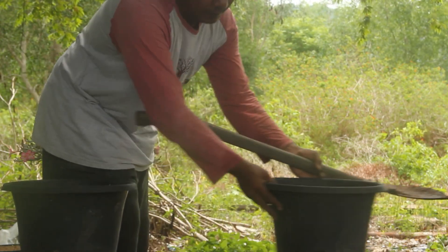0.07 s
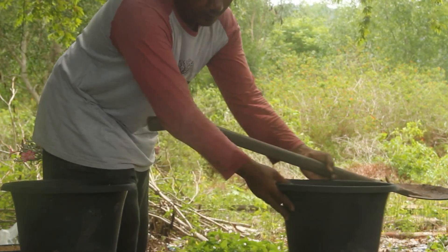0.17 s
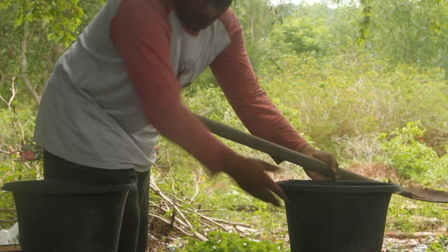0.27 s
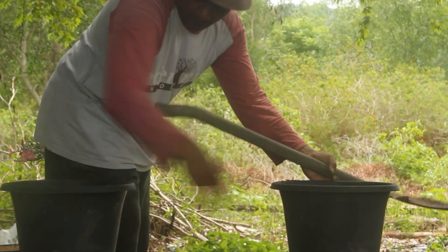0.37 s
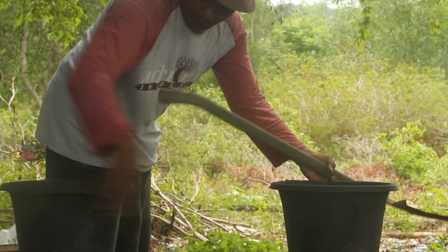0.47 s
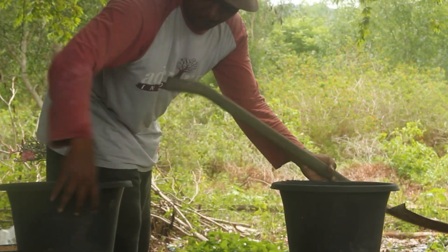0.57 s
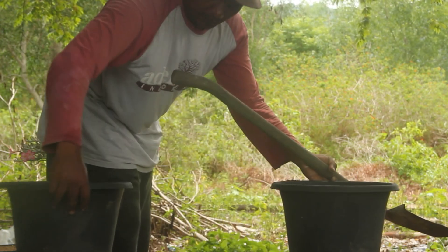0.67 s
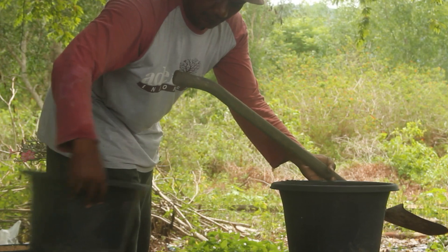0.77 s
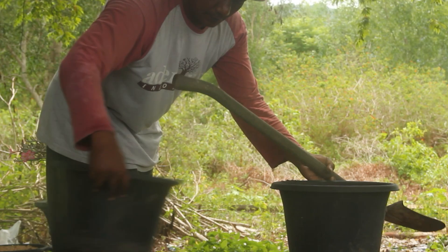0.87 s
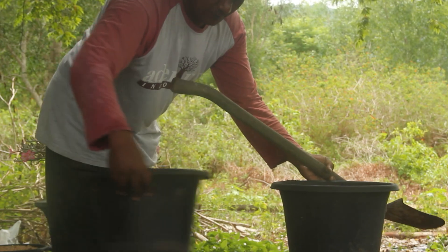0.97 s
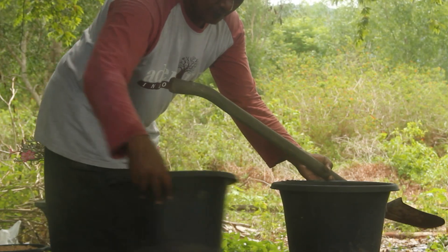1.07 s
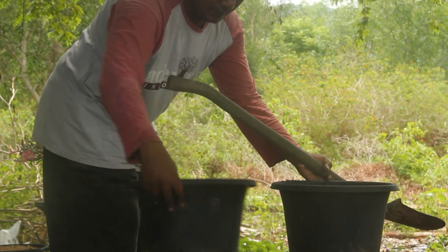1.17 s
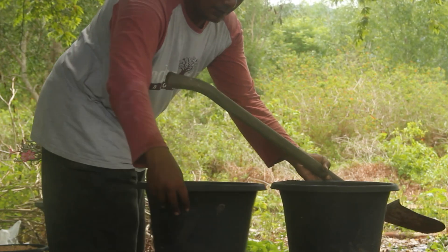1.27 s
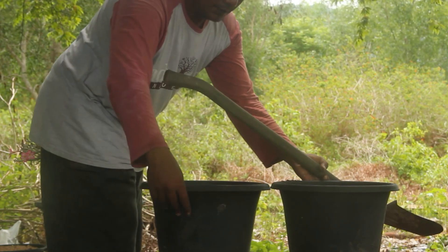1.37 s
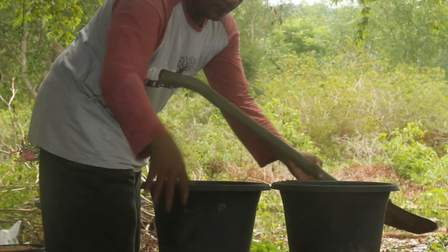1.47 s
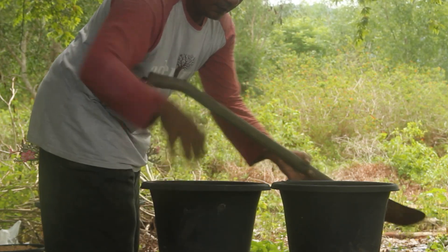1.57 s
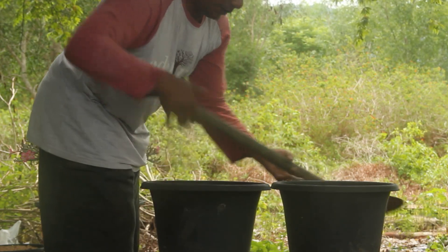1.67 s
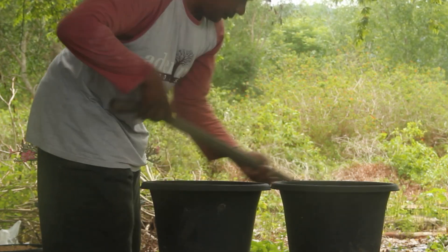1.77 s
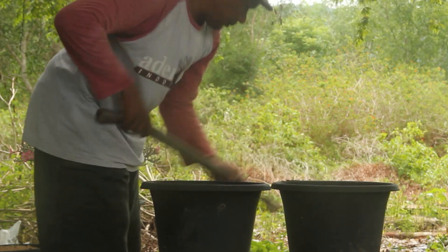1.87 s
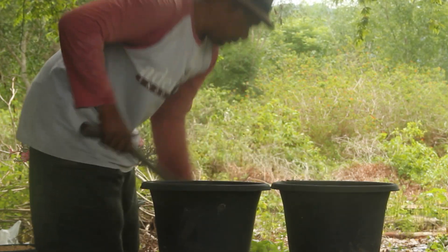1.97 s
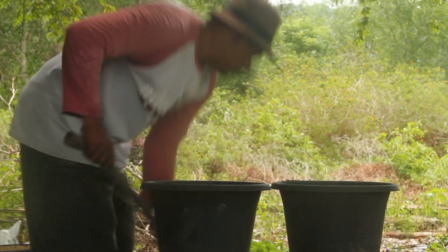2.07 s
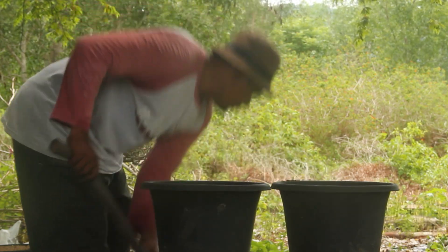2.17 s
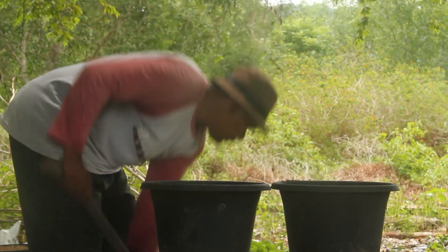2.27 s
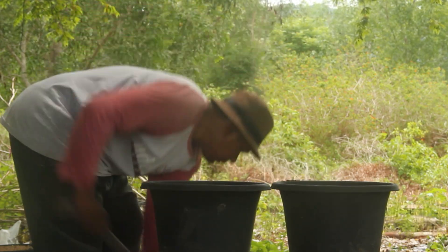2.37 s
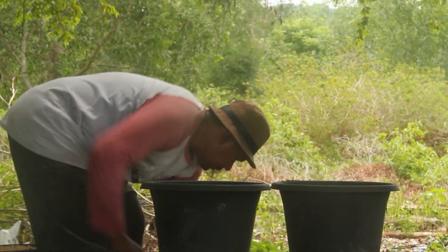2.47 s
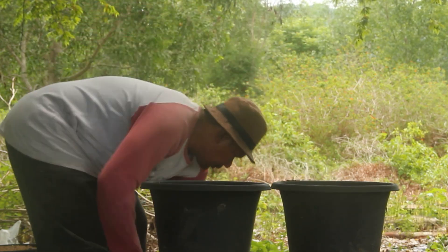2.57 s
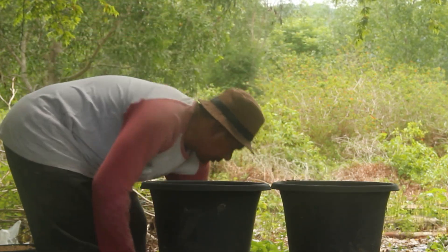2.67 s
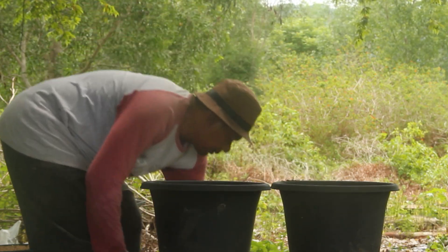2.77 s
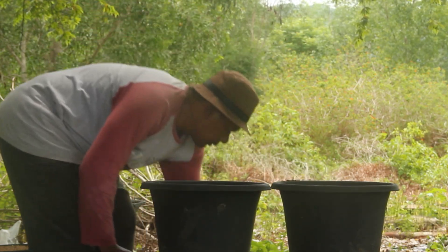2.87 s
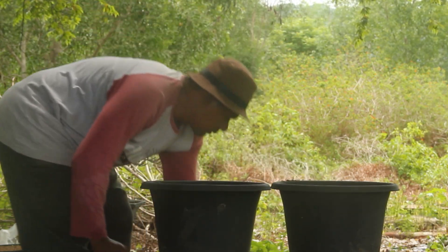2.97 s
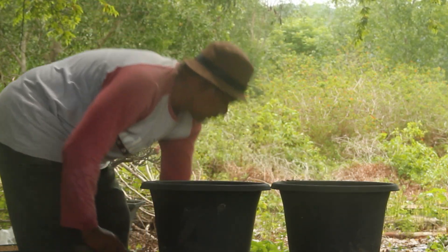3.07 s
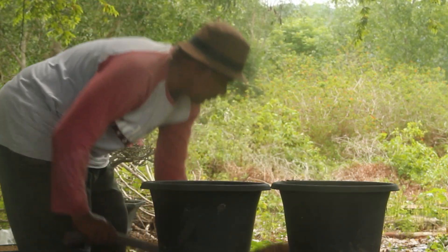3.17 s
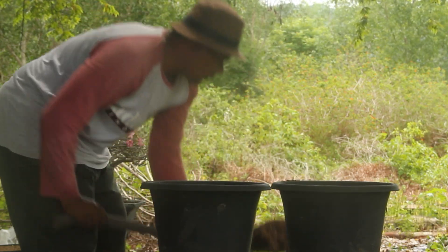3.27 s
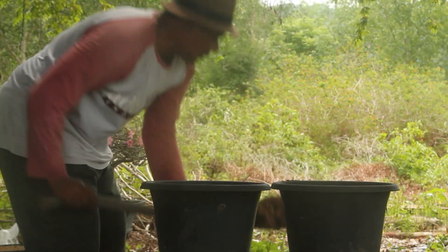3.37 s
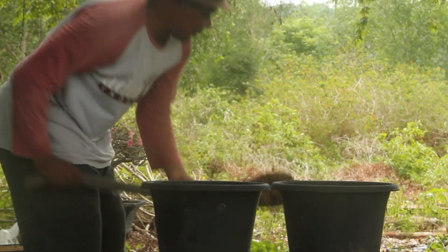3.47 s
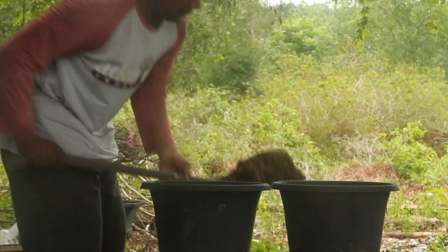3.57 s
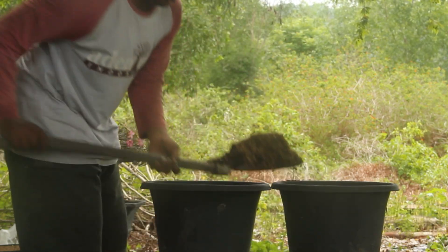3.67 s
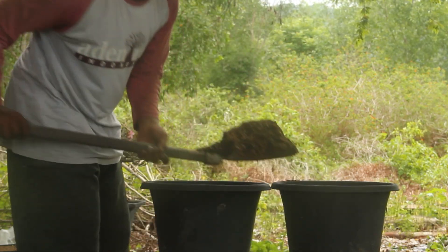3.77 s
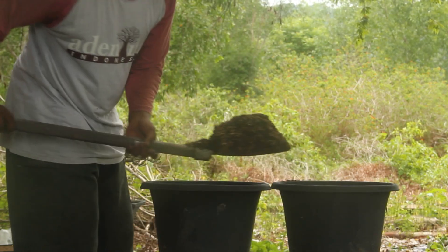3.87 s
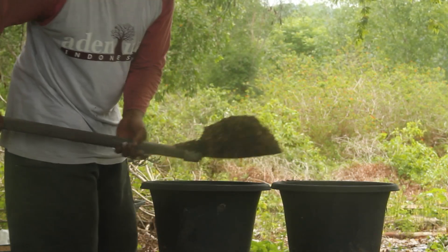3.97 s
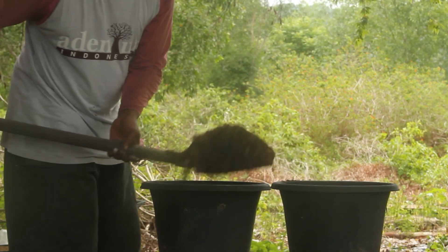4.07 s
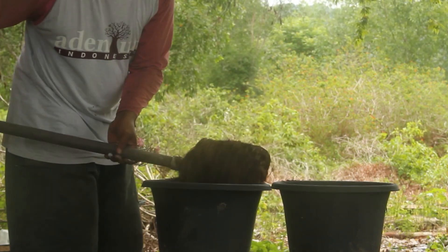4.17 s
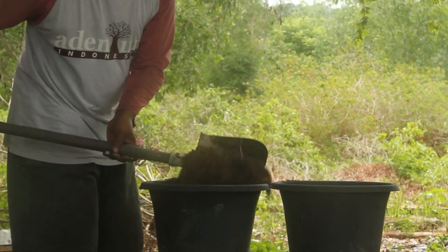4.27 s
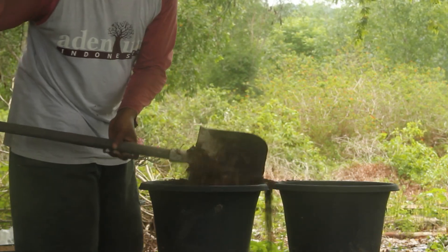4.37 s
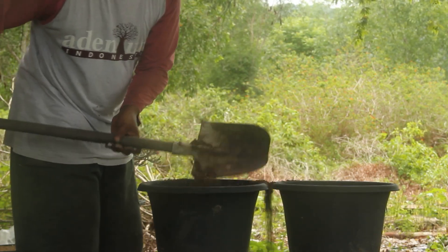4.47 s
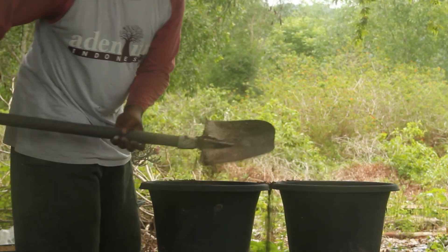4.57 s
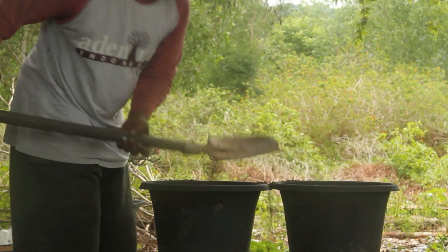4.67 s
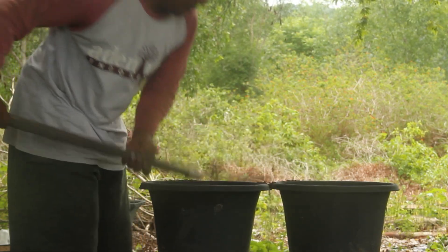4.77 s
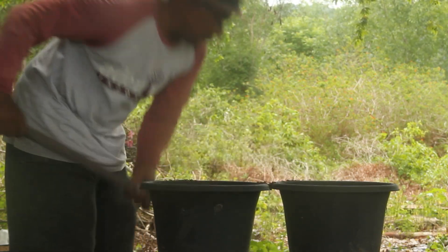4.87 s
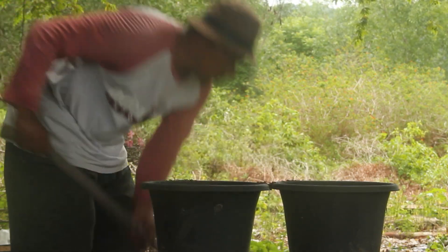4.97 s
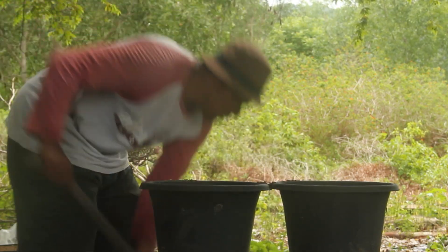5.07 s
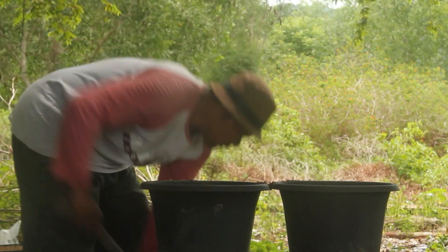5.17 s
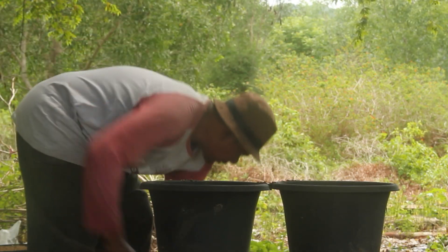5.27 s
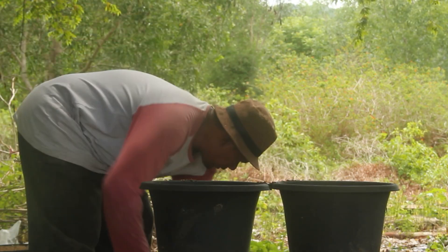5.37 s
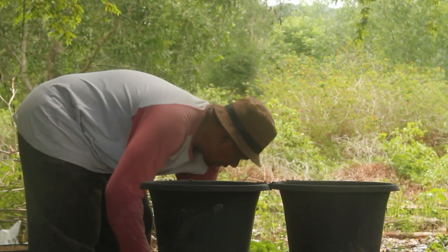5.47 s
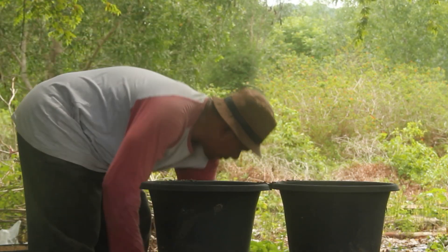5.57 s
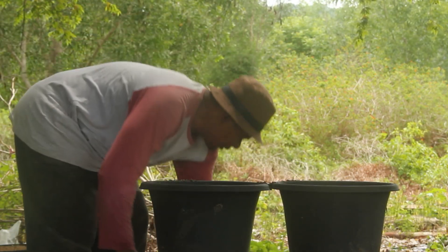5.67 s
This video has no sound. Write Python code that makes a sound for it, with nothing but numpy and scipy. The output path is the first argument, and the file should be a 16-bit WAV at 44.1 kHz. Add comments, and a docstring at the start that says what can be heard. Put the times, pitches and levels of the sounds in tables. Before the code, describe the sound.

Outdoors, a bird calls as plastic pots are shifted; a steel shovel crunches into dry soil, dumps it with hollow thumps, and digs again.

```python
"""Shovelling potting mix outdoors

A gardener shifts two plastic pots, drives a steel shovel into a heap of dry mix, tips the load into
a pot, scuffs the blade clean on the rim and digs again. Each scrape is thousands of tiny clicks of
grit, which make the blade or the plastic ring; blows thump the hollow pot. One bird whistles close
by and others faintly, over the low wash of the open air."""
import sys
import numpy as np
from scipy import signal
from scipy.fft import rfft, irfft
from scipy.io import wavfile
from scipy.ndimage import uniform_filter1d

SR = 44100
rng = np.random.default_rng(int(sys.argv[2]) if len(sys.argv) > 2 else 0)


def store_wav(level_fs):
    """Save 16-bit WAV to argv[1]."""
    pcm = np.round(np.clip(np.atleast_2d(level_fs), -1, 1) * 32767)
    wavfile.write(sys.argv[1], SR, pcm.T.astype(np.int16))


N = 251811
TIME = np.arange(N) / SR
FREQ = np.fft.rfftfreq(N, 1 / SR)


def amp(db):
    return 10 ** (np.asarray(db) / 20)


def normalised(x):
    return x / np.sqrt(np.mean(x ** 2) + 1e-20)


def tone_curve(points):
    """Join (pitch, level) points into a gain for every frequency."""
    hz, db = np.transpose(points)
    return amp(np.interp(np.log(FREQ + 1), np.log(hz + 1), db))


def add(mix, start, sound):
    part = mix[max(round(start * SR), 0):][:len(sound)]
    part += sound[:len(part)]


def filtered(x, gain):
    return irfft(rfft(x, N) * gain, N)


def above(edge_hz, order=8):
    """Gain that keeps what is above the edge; 1 minus it keeps what is below."""
    return 1 - 1 / (1 + (FREQ / edge_hz) ** order)


def wobble(rate_hz, order=4):
    """A random wavering, mostly slower than the given rate."""
    return normalised(filtered(rng.standard_normal(N), 1 - above(rate_hz, order)))


def click_sound(gain, size=4096):
    """One click with the given tone; all of its ringing comes after the hit."""
    log_gain = np.log(np.maximum(gain / gain.max(), 1e-5))
    cepstrum = irfft(log_gain, N)[:size]
    cepstrum[1:] *= 2
    click = irfft(np.exp(rfft(cepstrum, N)), N)[:size]
    return click / np.linalg.norm(click)


def plate_click(tone, notes, ring_db, width_scale=1, lag_s=.004, size=6000):
    """A tap on a thin plate: notes stand out of a broad tone, and bending waves bring the bass late."""
    peaks = sum(amp(db) ** 2 / (1 + (2 * (FREQ - hz) / (width * width_scale)) ** 2) ** 1.78
                for hz, width, db in notes)
    power = tone_curve(tone) ** 2 + amp(ring_db) ** 2 * peaks
    click = click_sound(np.sqrt(power) * above(96, order=4))
    late_bass = np.exp(-4j * np.pi * lag_s * np.sqrt(1000 * FREQ))
    return filtered(click, late_bass)[:size]


def grains(per_s, spread_db, clump_db, clump_hz):
    """Crumbs collide at random, a few much harder than the rest, in clumps as they stick and slip."""
    strength = amp(spread_db * np.minimum(rng.exponential(1, N), 4)) * rng.choice([-1, 1], N)
    clumps = amp(clump_db * np.clip(wobble(clump_hz, order=2), -2, 2))
    return strength * (rng.random(N) < per_s / SR) * clumps


def envelope(start, rise, hold, fall_db_per_s):
    """The loudness of one movement: it builds up, holds and dies away."""
    age = TIME - start
    return np.clip(age / max(rise, 1e-4), 0, 1) * amp(-fall_db_per_s * np.maximum(age - rise - hold, 0))


def strokes(rows, crumbs, click, fall_db_per_s, sag_db_per_s=0, darken_db_per_s=0, swell_db=0):
    """Crumbs ring an object, one stroke a row; a heavy load brings out its bass, dry grit its treble."""
    sound = signal.oaconvolve(crumbs, click)[:N]
    sound /= np.sqrt(uniform_filter1d(sound ** 2, size=1500))  # steady, so the arm sets the force
    bass, treble = 1 - above(1300), above(7000)
    low, mid, high = (normalised(filtered(sound, gain)) for gain in (bass, 1 - bass - treble, treble))
    out = np.zeros(N)
    for start, rise, hold, level_db, bass_db, treble_db in rows:  # bass and treble count from the level
        age = np.clip(TIME - start, 0, 1)
        dark_db = darken_db_per_s * age
        arch = np.sin(np.pi * np.minimum(age / (rise + hold), 1)) ** 2
        low_gain = amp(bass_db + np.minimum(dark_db, darken_db_per_s * hold) + swell_db * arch)
        level = amp(level_db - sag_db_per_s * age) * envelope(start, rise, hold, fall_db_per_s)
        out += level * (mid + low_gain * low + amp(treble_db - dark_db) * high)
    return out


def echoes(fade_s, size=22050):
    """Scattered echoes that die away by 60 dB in the fade time."""
    taps = rng.choice([-1., 1.], size) * (rng.random(size) < .1) * amp(-60 * TIME[:size] / fade_s)
    return taps / np.linalg.norm(taps)


# the tone of the open air: (pitch [Hz], level [dB])
AIR_TONE = [(12, -58), (20, -40), (52, -7), (101, -3.5), (146, -2), (182, -4), (301, -4.5), (499, -6.5),
            (1570, -16), (2020, -16), (2750, -16), (3740, -12), (7520, -9), (12400, -9.5), (16000, -11)]
# how loud the background hiss is: (time [s], level [dB])
BACKGROUND_HISS = [(.35, -54), (.85, -62), (1.6, -62), (2.2, -57), (3.2, -53), (3.75, -55), (5.0, -52),
                   (5.68, -52)]


def open_air(wash_db=-44.5, swell_db=1.32, split_hz=3200):
    """A low distant wash and a thin high hiss swell gently together."""
    noise = filtered(rng.standard_normal(N), tone_curve(AIR_TONE))
    treble = above(split_hz, order=4)
    wash = amp(wash_db) * normalised(filtered(noise, 1 - treble))
    hiss = amp(np.interp(TIME, *np.transpose(BACKGROUND_HISS))) * normalised(filtered(noise, treble))
    return amp(swell_db * wobble(6.2)) * (wash + hiss)


# the tone of rubbing plastic: (pitch [Hz], level [dB])
RUB_TONE = [(150, -43), (250, -2.5), (330, -17), (373, -3.5), (493, -9), (566, -4.5), (922, -1.5),
            (1470, -4.5), (3170, -9), (8260, -19), (13200, -14.5), (16000, -18)]
# a pot is dragged: (time [s], rise [s], hold [s], level [dB], bass [dB], treble [dB])
POT_RUBS = [(0.0, .002, .004, -29.5, -8, -3), (.035, .05, .095, -39.5, -3, -6),
            (.22, .03, .22, -51.5, 2, -12), (.53, .015, .05, -43.5, -1, -4), (.6, .02, .04, -48, -3, -12),
            (.656, .012, .024, -42, -5, -17), (.72, .02, .045, -52, 0, -18),
            (1.038, .007, .012, -47, 7, 4.5), (1.160, .003, .045, -38, -6, -8),
            (1.225, .085, .075, -34.5, -8, -5.5)]


def pot_rubs(gain_db=1.5):
    """Thin plastic rubs over a gritty surface."""
    grit = grains(per_s=5000, spread_db=1.5, clump_db=1.1, clump_hz=90)
    return amp(gain_db) * strokes(POT_RUBS, grit, click_sound(tone_curve(RUB_TONE)), fall_db_per_s=260)


# the tone of a skid: (pitch [Hz], level [dB])
SKID_TONE = [(240, -31), (400, -3.5), (906, -3.5), (2120, -2), (2710, 0.5), (3120, -4.5), (3420, 1),
             (8370, -11), (10100, -9.5), (16000, -15)]
# the notes a pot's wall rings at: (pitch [Hz], width [Hz], level [dB])
WALL_NOTES = [(883, 50, -5), (2640, 33, -5), (3420, 53, 0), (3930, 130, -7), (6050, 100, -4),
              (6880, 22, -10), (9200, 41, -6), (9630, 30, -3), (10200, 49, -1), (10700, 130, -11),
              (11800, 82, -8), (12100, 44, -8), (12500, 270, -7), (13600, 50, -6)]
# a pot skids: (time [s], level [dB], hold [s], brightness [dB per octave], ring next to scrape [dB])
POT_SKIDS = [(.002, -30, 0.022, 3.5, -12), (.055, -34.5, 0.036, 0.5, -14), (0.178, -29, 0.021, 7.5, 2.5),
             (0.435, -40, .01, 1.5, -16), (0.46, -40.5, 0.023, 2.5, -19), (0.578, -34.5, 0.0067, 0, -11),
             (0.663, -32, 0.0059, 0.5, -12), (1.046, -40.5, 0.01, -1, -10),
             (1.161, -36.5, 0.0094, -5.5, -10)]


def pot_skids(fade_s=.17):
    """Short bright skids make the pot's wall ring."""
    slips = grains(per_s=8300, spread_db=2.7, clump_db=1.1, clump_hz=130)
    scrape = signal.oaconvolve(slips, click_sound(tone_curve(SKID_TONE)))[:N]
    wall = plate_click(SKID_TONE, WALL_NOTES, ring_db=14, width_scale=.9)
    ring = normalised(signal.oaconvolve(slips, wall)[:N])
    out = np.zeros(N)
    for start, db, hold, brightness, ring_db in POT_SKIDS:
        age = TIME - start
        level = amp(db) * np.clip(age / .001, 0, 1) * amp(-60 * np.maximum(age - hold, 0) / fade_s)
        skid = normalised(filtered(scrape, amp(brightness * np.log2(FREQ + 200))))
        out += level * (skid + amp(ring_db) * ring)
    return out


# dry crumbs and twigs snap: (time [s], peak level [dB], pitch [Hz], pitch spread [octaves])
SNAPS = [(.056, -19, 11100, .9), (.654, -20, 3200, 1.4), (.793, -38, 3000, 1.3), (1.048, -24, 12000, .65),
         (1.163, -25, 12000, .7), (2.162, -21, 2600, .5), (2.184, -35, 12000, .7), (2.227, -37, 6000, .65),
         (2.304, -11, 6800, .45), (2.448, -9, 7500, .7), (3.996, -27, 3000, 1.8), (4.153, -20, 4000, 2),
         (4.186, -24, 3000, 1.3), (4.319, -11.5, 3700, .85), (5.184, -16, 3000, 1.8)]


def dry_snaps(fade_s=.0049, size=2048):
    """Each snap is a very short burst of noise around its own pitch."""
    out = np.zeros(N)
    for start, db, pitch_hz, octaves in SNAPS:
        tone = 1 / (1 + (np.log2((FREQ + 1) / pitch_hz) / octaves) ** 4)
        burst = rng.standard_normal(size) * amp(-60 * TIME[:size] / fade_s)
        snap = signal.fftconvolve(burst, click_sound(tone, size=512))
        add(out, start, amp(db) * snap / abs(snap).max())
    return out


# the notes of the hollow pot: (pitch [Hz], level [dB], time to fade by 60 dB [s])
HOLLOW_NOTES = [(147, -3.5, 0.15), (171.3, 0.5, 0.2), (274, -4, 0.13), (338.4, 6.5, 0.16), (435, -6, 0.06),
                (483, 4, 0.1), (675, -8, 0.11), (924, 4, 0.091), (1104, 6, 0.054), (1175, 13.5, 0.03),
                (1280, -6, 0.044), (1450, -4, .04)]
# the ground or a big clod hits a pot: (time [s], level [dB], hardness [Hz], crumbling after [ratio])
POT_KNOCKS = [(.117, -18, 960, .7), (1.04, -33.5, 400, 1.3), (1.245, -21, 1300, 1.3),
              (1.285, -26, 1100, 1.2), (1.315, -23.5, 1100, .9), (3.957, -30, 1360, 1),
              (4.153, -15.5, 235, .2), (4.153, -21, 950, .4), (4.164, -14.5, 1200, .25),
              (4.170, -15.5, 885, .2), (4.186, -24, 332, .3), (4.253, -22, 1500, 1.5),
              (4.318, -25, 160, .75), (4.353, -15.5, 1210, .6), (4.376, -16.5, 1400, .7)]


def pot_knocks(clods, focus=4.8, size=8000):
    """Knocks and falling clods thump a hollow pot: soft ones wake its low notes, hard ones its high."""
    out, t = np.zeros(N), TIME[:size]
    for start, db, hard_hz, crumble in POT_KNOCKS + clods:
        ring = np.zeros(size)
        for hz, note_db, fade_s in HOLLOW_NOTES:
            note = amp(note_db - 60 * t / fade_s) * np.sin(2 * np.pi * (hz * t + rng.random()))
            ring += note / (hz / hard_hz + hard_hz / hz) ** focus  # favours notes near the hardness
        ring *= np.minimum(t / .00066, 1)
        ring += crumble * signal.oaconvolve(ring, echoes(fade_s=.06))[:size]
        add(out, start, amp(db) * ring / abs(ring).max())
    return filtered(out, above(130, order=4))


def whistle(hz, level, rasp, rasp_hz, octave_db):
    """A bird's almost pure note; a fast wobble of the pitch makes it harsh."""
    phase = 2 * np.pi * np.cumsum(hz * (1 + rasp * wobble(rasp_hz))) / SR
    return np.sqrt(2) * level * (np.sin(phase) + amp(octave_db) * np.sin(2 * phase))


# distant chirps: (time [s], length [s], first pitch [Hz], last pitch [Hz], bend [Hz], level [dB])
FAR_CHIRPS = [(.30, .13, 7250, 6950, 30, -52), (.68, .13, 3020, 2700, -80, -44),
              (1.55, .05, 2600, 1800, 600, -45), (1.603, .063, 1950, 2400, 330, -43),
              (2.055, .04, 2200, 2450, 30, -48), (2.09, .035, 2600, 2400, 330, -46),
              (2.99, .15, 3000, 2500, 120, -53)]


def far_birds(gain_db=-4):
    """Thin gliding chirps, each loudest and most bent in pitch at its middle."""
    out = np.zeros(N)
    for start, length, first_hz, last_hz, bend_hz, db in FAR_CHIRPS:
        progress = np.clip((TIME - start) / length, 0, 1)
        arch = 4 * progress * (1 - progress)
        hz = first_hz + (last_hz - first_hz) * progress + bend_hz * arch
        out += whistle(hz, amp(db) * arch, rasp=.025, rasp_hz=250, octave_db=-28)
    return amp(gain_db) * out


def near_bird(start=1.312, level_db=-18.7, low_hz=2590, drop_after_s=.053, drop_s=.009):
    """One harsh call that climbs, then drops quickly to a low held pitch."""
    age = np.clip(TIME - start, 0, 1)
    climbing_hz = 4000 + 13000 * age
    dropped = (1 + np.tanh((age - drop_after_s) / drop_s)) / 2
    hz = (1 - dropped) * climbing_hz + dropped * low_hz
    level = amp(level_db) * envelope(start, rise=.055, hold=.033, fall_db_per_s=350)
    return whistle(hz, level, rasp=.075, rasp_hz=453, octave_db=-16)


# stones hit the blade: (time [s], level [dB])
STONE_HITS = [(2.3032, -10), (2.3326, -14), (2.398, -7), (2.4474, -3.5), (2.4584, -9), (5.1908, -2),
              (5.2206, -5), (5.4365, -11), (5.5194, -30)]


def stones(dig_start, blade, gain_db=15, sharp_hz=3500):
    """The stones within a second of a dig strike the blade and rattle along it."""
    hits = np.zeros(N)
    for start, db in STONE_HITS:
        if abs(start - dig_start) < 1:
            add(hits, start, amp(db) * np.array([.63]))  # the strike
            add(hits, start, amp(db) * echoes(fade_s=.014))  # the rattle
    hits = signal.lfilter(*signal.butter(1, sharp_hz, "high", fs=SR), hits)  # hard hits sound bright
    return amp(gain_db) * signal.oaconvolve(hits, blade)[:N]


# the blade's tone, muffled differently at each spot: (pitch [Hz], first dig [dB], second dig [dB])
BLADE_TONE = [(70, -60, -60), (161, -45, -31), (247, -5.5, -12), (396, -7, -13.5), (980, -4.5, -6.5),
              (1500, -7.5, -3.5), (2550, -4, 1), (3530, -4.5, 1), (5200, -11.5, -8.5), (6960, -17, -12),
              (10500, -20, -18), (14800, -25, -22.5), (16000, -40, -39)]
# the notes the blade rings at: (pitch [Hz], width [Hz], first dig [dB], second dig [dB])
BLADE_NOTES = [(399.5, 25, -2.5, -5), (557, 19, 2.5, -3.5), (708, 45, -4, -0.5), (817, 54, -0.5, 1.5),
               (1258, 25, 2, -12), (1339, 33, 5, 2), (1444, 22, 0, -14), (1560, 30, -19, -11),
               (1670, 39, 1, 4.5), (1749, 16, -3, -18), (2000, 43, -1, 4), (2100, 35, 3, 7),
               (2160, 25, -16, -8), (2310, 22, -2, -6), (2480, 42, 2.5, 0.5), (2660, 29, 4.5, -4),
               (2784, 34, 0, 3), (2990, 27, 1, 5), (3030, 40, -8, -15), (3443, 24, 4.5, 10),
               (3535, 31, -9, 2.5), (3860, 50, -19, -6), (4110, 30, -8, -12), (4300, 27, -17, 1),
               (5230, 89, -4, -2), (5370, 63, -20, -0.5), (6350, 80, -16, -13), (7400, 54, -8, -12),
               (7760, 97, -25, -13.5), (8330, 75, -13, -20)]
# pushes into the heap: (time [s], hold [s], level [dB], bass [dB], treble [dB], slow fade [dB/s],
# final fade [dB/s], bass swell [dB], head start of the scratch [s], scratch level [dB])
SHOVEL_DIGS = [(2.330, .235, -14.2, -10.3, -8.3, 34, 112, 7.5, .027, -26),
               (5.186, .165, -16, -7.5, -5, 10, 145, .5, .012, -42)]


def shovel(dig, scrape_db=-.7, sand_db=-3):
    """The blade scratches the crust and grinds in; as it sinks, bass grows and treble fades."""
    start, hold, level_db, bass_db, treble_db, sag, fall, swell_db, lead, scratch_db = SHOVEL_DIGS[dig]
    scratch = (start - lead, 0, lead, scratch_db, -17, -3)  # same columns as POT_RUBS
    push = (start, .005, hold, level_db, bass_db, treble_db)
    tone = np.array(BLADE_TONE)[:, [0, 1 + dig]]
    notes = np.array(BLADE_NOTES)[:, [0, 1, 2 + dig]]
    blade = plate_click(tone, notes, ring_db=3)
    crumbs = normalised(grains(per_s=6000, spread_db=2, clump_db=.5, clump_hz=110))
    sand = grains(per_s=350, spread_db=1, clump_db=6, clump_hz=60)
    soil = crumbs + amp(sand_db) * normalised(filtered(sand, above(4700, order=3)))
    scrape = strokes([scratch, push], soil, blade, fall, sag, darken_db_per_s=22, swell_db=swell_db)
    return amp(scrape_db) * scrape + stones(start, blade)


# the tone of sliding soil: (pitch [Hz], level [dB])
SLIDE_TONE = [(180, -26), (300, -12), (725, -14), (774, -14), (1300, -6), (1810, -10), (1970, -3),
              (2740, -4.5), (3240, -8.5), (11900, -12.5), (16000, -21)]
# soil slides after a dig: (time [s], rise [s], hold [s], level [dB], bass [dB], treble [dB])
SOIL_SLIDES = [(2.684, .09, .12, -27.3, -14.5, -9), (5.5, .03, .15, -46, -9, -20)]


def sliding_soil(gain_db=-1.2):
    """Fine loose mix slides over the buried, muffled blade."""
    crumbs = grains(per_s=16000, spread_db=1, clump_db=-.3, clump_hz=70)
    click = click_sound(tone_curve(SLIDE_TONE))
    return amp(gain_db) * strokes(SOIL_SLIDES, crumbs, click, fall_db_per_s=280, sag_db_per_s=3)


# the tone of pouring soil: (pitch [Hz], level [dB])
POUR_TONE = [(47, -51), (80, -17), (178, -9), (212, -6.5), (331, -8), (515, -9), (563, -6), (802, -7),
             (1170, -5), (1670, -4), (2900, -5), (8050, -16.5), (13700, -17), (16000, -26)]
# soil leaves the blade: (time [s], rise [s], hold [s], level [dB], bass [dB], treble [dB])
SOIL_SPILLS = [(3.954, .012, .035, -39.5, -4, -4.5), (4.048, .005, .09, -43.5, -6, -6),
               (4.150, .002, .04, -32.5, 1.5, -7), (4.248, .005, .045, -32.5, -1, -13),
               (4.283, .04, .03, -27.8, -2, -8), (4.37, .02, .06, -38.5, -5, -1.5),
               (4.565, .025, .008, -37, -5, -6), (4.648, .012, .008, -42.5, 1, -12),
               (4.5, .03, .3, -52, -2, -9)]


def pouring(gain_db=-1):
    """Crumbs trickle off the blade, then the whole load runs into the pot."""
    crumbs = grains(per_s=3600, spread_db=1.5, clump_db=2, clump_hz=80)
    click = click_sound(tone_curve(POUR_TONE))
    return amp(gain_db) * strokes(SOIL_SPILLS, crumbs, click, fall_db_per_s=260)


def falling_clods(start=4.27, length_s=.035, level_db=-26, hard_hz=295, crumble=.55, count=3):
    """Soft clods land on the pot's floor at uneven moments; gives rows like those of POT_KNOCKS."""
    rows = []
    for k, (late, strong, hard) in enumerate(rng.uniform(-1, 1, (count, 3))):
        landing = start + length_s * (k + (1 + late) / 2) / count
        rows.append((landing, level_db + 3 * strong, hard_hz * 2 ** (.3 * hard), crumble))
    return rows


# the tone of the scuff: (pitch [Hz], level [dB])
SCUFF_TONE = [(120, -48), (200, -17), (529, -14), (763, -3.5), (1650, -7), (2210, 0), (2420, -5),
              (3620, -4), (7410, -15), (12200, -9), (16000, -20)]
# the notes the pot's rim rings at: (pitch [Hz], width [Hz], level [dB])
RIM_NOTES = [(431, 36, -12), (770, 32, -8), (1140, 24, -5), (1300, 34, -5), (1480, 36, -6), (1790, 25, -7),
             (2190, 44, -2), (2480, 15, -9), (2660, 43, -1), (2940, 56, 0), (3120, 25, -6), (3360, 57, -4),
             (3550, 15, -3), (3760, 38, -2), (4010, 31, -6), (4130, 15, -9), (4430, 35, -5),
             (4840, 120, -5), (5260, 25, -7), (5710, 35, -9), (5920, 39, -6), (6230, 28, -7),
             (6550, 78, -12), (6760, 100, -13), (7040, 27, -8), (7750, 26, -8)]
# one wipe of the blade: (time [s], rise [s], hold [s], level [dB], bass [dB], treble [dB])
RIM_WIPE = (4.431, .010, .026, -18.2, -11.5, -4.5)


def rim_scuff():
    """The empty blade drags over the pot's rim, which rings."""
    grit = grains(per_s=8000, spread_db=0, clump_db=0, clump_hz=120)
    rim = plate_click(SCUFF_TONE, RIM_NOTES, ring_db=10)
    return strokes([RIM_WIPE], grit, rim, fall_db_per_s=305, darken_db_per_s=12)


def scene():
    """The work echoes faintly off ground and bushes, the birds off the trees, over the open air."""
    work = sum(shovel(dig) for dig in range(len(SHOVEL_DIGS)))
    work += sliding_soil() + pouring() + rim_scuff()
    work += pot_knocks(falling_clods()) + pot_rubs() + pot_skids() + dry_snaps()
    work_echo = amp(-13) * signal.oaconvolve(work, echoes(fade_s=.093))[:N]
    near, far = near_bird(), far_birds()
    bird_echo = signal.oaconvolve(amp(-5) * near + amp(-4) * far, echoes(fade_s=.24))[:N]
    return (work + work_echo + near + far + bird_echo + open_air())[None]


def record(dry, top_hz=16150):
    """Clip peaks at full scale and cut the very highest treble."""
    low_pass = signal.firwin(511, top_hz, window=("kaiser", 9), fs=SR)
    return signal.oaconvolve(np.clip(dry, -1, 1), low_pass[None], "same")


dry = scene()
out = record(dry)
store_wav(out)
```